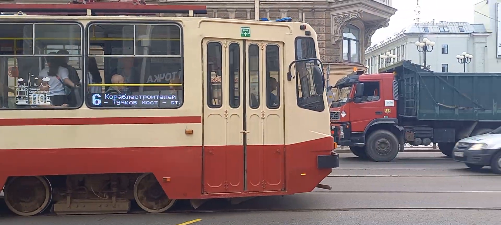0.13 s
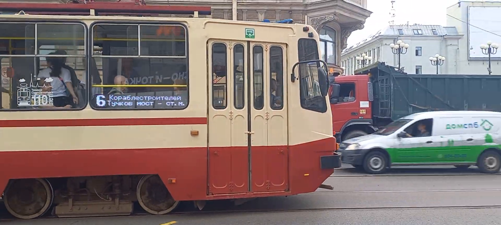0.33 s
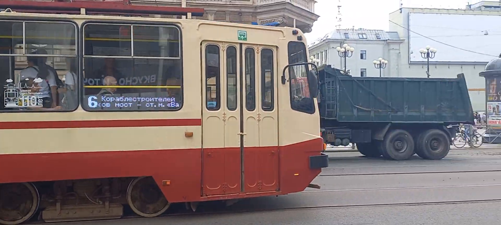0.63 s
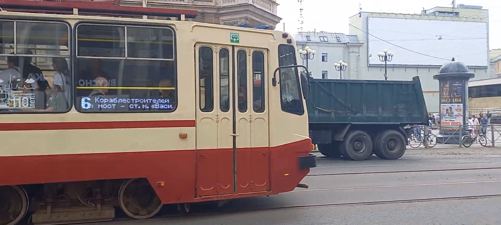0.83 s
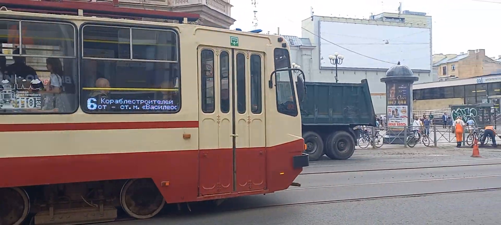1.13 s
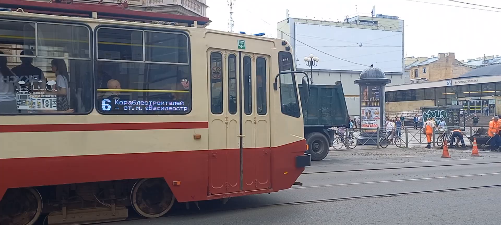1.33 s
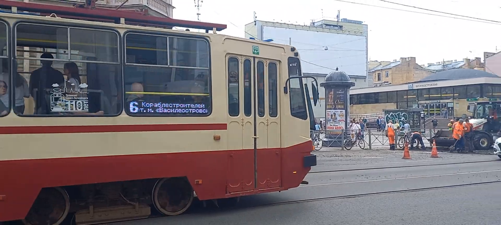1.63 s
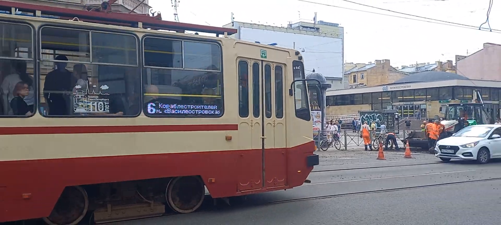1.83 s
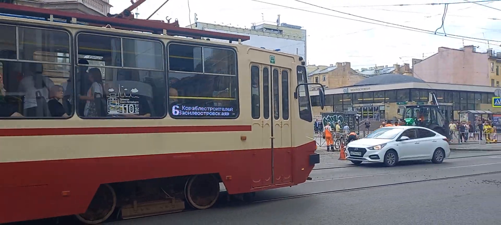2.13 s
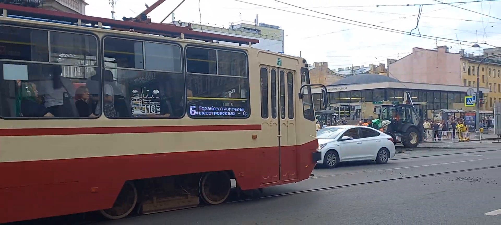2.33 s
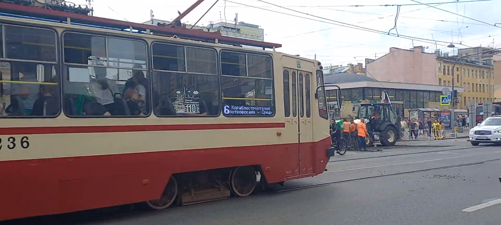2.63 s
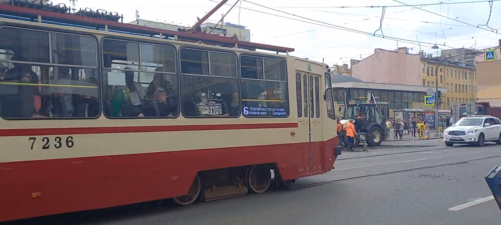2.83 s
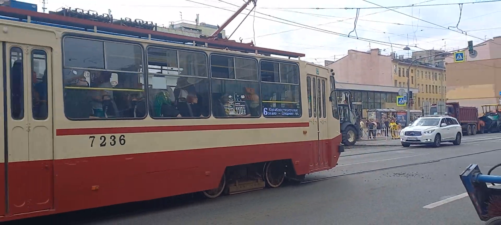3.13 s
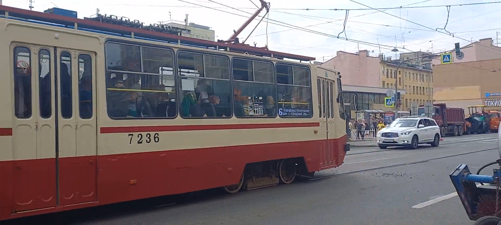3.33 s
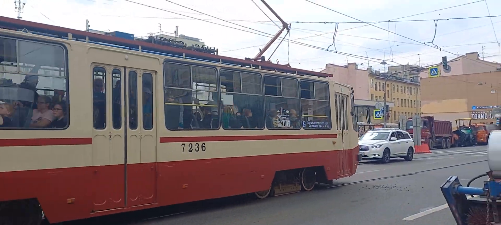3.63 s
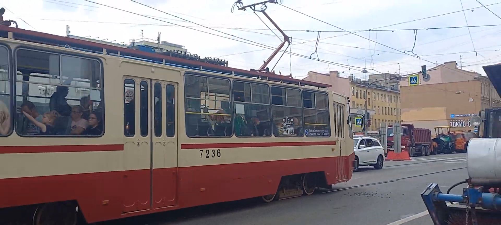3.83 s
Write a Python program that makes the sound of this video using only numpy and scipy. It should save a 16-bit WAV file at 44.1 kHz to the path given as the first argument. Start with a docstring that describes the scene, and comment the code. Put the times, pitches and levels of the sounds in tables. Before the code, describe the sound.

A tram rumbles slowly past up close, clanking, with brief flange squeaks near the end.

```python
"""A tram rolls slowly past at close range while a van passes early on, its tyres pattering over steady traffic.
The body rumbles and booms as filtered jolts and low tones, motors whirr, wheels hiss and crush grit.
Loose running gear soon clanks, as contacts ringing steel modes; then panels shudder and jolts thud.
A flange then catches the rail: wavering tones and scraped wheel modes squeak, hardest near the end.
Single wheel modes sing faintly in between, and draught buffets the microphones as lumpy low noise."""
import sys
import numpy as np
from scipy import signal
from scipy.fft import rfft, irfft
from scipy.io import wavfile
from scipy.ndimage import uniform_filter1d

SR = 44100
rng = np.random.default_rng(int(sys.argv[2]) if len(sys.argv) > 2 else 0)


def transcribe(signal):
    """Save signal, clipped to [-1, 1], as a 16-bit WAV file at the path in sys.argv[1]."""
    frames = np.atleast_2d(signal).T
    limited = np.clip(frames, -1, 1)
    pcm = np.round(limited * 32767).astype(np.int16)
    wavfile.write(sys.argv[1], SR, pcm)


N = 176400
T = np.arange(N) / SR
HZ = np.maximum(np.arange(N // 2 + 1) * SR / N, 1)
MIC_SPACING_S = 0.00049   # travel time between the two microphones
CUTOFF_HZ = 15750
EVEN_S = 0.043   # time over which small random jolts and contacts even out


def amp(db):
    """Decibels to gain."""
    return 10 ** (np.asarray(db) / 20)


def rms_one(x):
    """Scale to an rms of 1."""
    return x / np.sqrt(np.mean(x ** 2) + 1e-20)


def level(curve):
    """Gain over time from (s, dB) points."""
    return amp(np.interp(T, *np.transpose(curve)))


def drift(rate_hz):
    """Slow random wander of spread 1."""
    return rms_one(irfft(rfft(rng.standard_normal(N)) / (1 + (HZ / rate_hz) ** 2), N))


def colour(points):
    """Frequency response through (Hz, dB) points."""
    hz, db = np.transpose(points)
    return amp(np.interp(np.log(HZ), np.log(hz), db))


def resonances(modes):
    """Frequency response of parallel resonances, each carrying the power that its row gives."""
    response = 0
    for hz, width, db in modes:
        detuning = (HZ ** 2 - hz ** 2) / (HZ * width)
        response = response + amp(db) / np.sqrt(width) / (1 + 1j * detuning)
    return response


def echoes(count=6):
    """Frequency response of a few near reflections from road and underbody."""
    echo_db, latest_s = -12.5, 0.02
    delays = rng.uniform(0.1044, 1, count) * latest_s
    return 1 + amp(echo_db) * sum(np.exp(-2j * np.pi * HZ * s) for s in delays)


def grains(per_s, spread_db):
    """Random clicks, many small and a few large."""
    sizes = amp(spread_db * np.minimum(rng.exponential(1, N), 4))
    signs = rng.choice([-1, 1], N)
    return rms_one(sizes * signs * (rng.random(N) < per_s / SR))


def heard(response, direct, lead_ms, drive=None):
    """Stereo noise or drive through a response: a direct share that leads on the left, the rest diffuse noise."""
    source, mid, side = rfft(rng.standard_normal((3, N)))
    if drive is not None:
        source = rfft(drive)
    sign = np.array([[1], [-1]])
    share = np.clip(direct, 0, 1)
    # diffuse sound is alike at both microphones only at low frequencies
    alike = np.sinc(2 * HZ * MIC_SPACING_S)
    diffuse = np.sqrt((1 + alike) / 2) * mid + sign * np.sqrt((1 - alike) / 2) * side
    delay = np.exp(1j * np.pi * HZ * sign * lead_ms / 1000)
    mixed = np.sqrt(share) * source * delay + np.sqrt(1 - share) * diffuse
    return rms_one(irfft(response * mixed, N))


def swung(x, lead):
    """Shift the two channels against each other over time."""
    half = np.interp(T, *np.transpose(lead)) / 2
    return np.array([np.interp(T + half, T, x[0]), np.interp(T - half, T, x[1])])


def evened(x, window_s):
    """Hold the rms near 1 over a short window."""
    power = uniform_filter1d(np.mean(x ** 2, axis=0), max(int(window_s * SR), 1))
    return x / np.sqrt(power + .01)


def fluttering(x, count=24):
    """Let narrow bands of a sound flutter independently of each other."""
    patchy_db, patch_rate_hz = 2.5, 48
    spectrum, centres = rfft(x), np.linspace(0, CUTOFF_HZ, count)
    out = 0
    for hz in centres:
        band = irfft(spectrum * np.maximum(1 - abs(HZ - hz) / centres[1], 0), N)
        out = out + band * amp(patchy_db * drift(patch_rate_hz))
    return rms_one(out)


def burst(start, attack, decay, hold=0):
    """Envelope that rises, holds and dies away."""
    age = np.maximum(T - start, 0)
    return np.minimum(age / attack, 1) * np.exp(-np.maximum(age - max(attack, hold), 0) / decay)


def swell(start, length):
    """Envelope that rises and falls in one arch."""
    return np.sin(np.pi * np.clip((T - start) / length, 0, 1))


def note(hz, waver_hz):
    """A slightly unsteady sine of rms 1."""
    return np.sqrt(2) * np.sin(2 * np.pi * np.cumsum(hz + waver_hz * drift(57)) / SR)


def body(lumps_db=0.46, panel_db=-1.0):
    """Dense jolts from the track shake the floor and the side panels, which shudder in surges; jolts thud."""
    # Deep floor vibration. Each row: time in seconds, level in dB.
    floor_level = [(0, -29.5), (.55, -33), (1, -28.5), (1.5, -37), (2.3, -32), (2.9, -32.5), (3.5, -28),
                   (4, -29.5)]
    # Tone of the floor. Each row: frequency in Hz, relative density in dB per Hz.
    floor_tone = [(20, -41), (38, -51), (58, -10), (90, -6), (125, -4.5), (165, -4), (230, -55),
                  (500, -118)]
    # Steady panel rumble. Each row: time in seconds, level in dB before panel_db.
    panel_level = [(0, -25), (.3, -28.5), (.55, -27), (.82, -30), (.92, -24.5), (1.04, -24.5), (1.23, -29),
                   (1.5, -27.5), (2.06, -28.5), (2.12, -24), (2.7, -24.5), (3.3, -25), (3.78, -24),
                   (4, -22)]
    # Tone of the panels. Each row: frequency in Hz, relative density in dB per Hz.
    panel_tone = [(70, -46), (150, -4.5), (210, -1.5), (270, 2.5), (370, -2.5), (460, -8), (600, -36.5),
                  (1000, -19.5), (2500, -60)]
    # Surges of the side panels. Each row: start in seconds, length in seconds, level in dB before panel_db.
    shudders = [(1.36, 0.047, -23), (1.452, 0.06, -25), (1.578, 0.11, -22.5), (1.776, 0.06, -23.5),
                (1.989, 0.043, -20.5), (2.105, 0.082, -22.5), (2.191, 0.048, -21), (2.38, 0.069, -24),
                (2.487, 0.068, -25.5), (2.609, 0.03, -19.5), (3.54, 0.032, -23.5)]
    # Wheels drop over uneven rail. Each row: start in seconds, level in dB.
    thuds = [(1.349, -23.5), (1.468, -22), (1.595, -25), (1.626, -22), (1.772, -22.5), (2.394, -15),
             (2.565, -25), (2.618, -37), (2.799, -19), (3.062, -17.5), (3.467, -13.5), (3.928, -17)]
    # Tone of the thuds. Each row: frequency in Hz, relative density in dB per Hz.
    thud_tone = [(25, -58), (60, 0), (120, 9), (200, 3.5), (300, 0.5), (480, -18.5), (900, -17.5),
                 (2500, -81)]
    thud_attack_s, thud_decay_s = 0.019, 0.014

    deep = level(floor_level) * heard(colour(floor_tone), direct=0.28, lead_ms=1.0)

    surges = sum((amp(db) * swell(s, length)) ** 2 for s, length, db in shudders)
    shaking = np.sqrt(level(panel_level) ** 2 + surges) * amp(lumps_db * drift(18))
    rumble = heard(colour(panel_tone), direct=0.93, lead_ms=0.29, drive=grains(900, 3.1))
    panels = shaking * evened(rumble, EVEN_S)

    jolts = sum(amp(db) * burst(s, thud_attack_s, thud_decay_s) for s, db in thuds)
    thudding = jolts * evened(heard(colour(thud_tone), direct=0.61, lead_ms=0.24), EVEN_S)
    return deep + amp(panel_db) * panels + thudding


def booms(waver_hz=3):
    """A low body-panel resonance swells and dies as a nearly pure tone."""
    # Each row: start in seconds, length in seconds, pitch in Hz, level in dB.
    panel_booms = [(0.052, .115, 135.9, -19), (0.171, .17, 135.6, -20), (2.272, 0.26, 126, -21.5),
                   (2.781, 0.13, 146, -23.5), (3.488, 0.19, 160.3, -27)]
    out, waver = 0, waver_hz * drift(12.5)
    for s, length, hz, db in panel_booms:
        tone = np.sqrt(2) * np.sin(2 * np.pi * np.cumsum(hz + waver) / SR)
        out = out + amp(db) * swell(s, length) * tone
    return out


def crackle(count=18):
    """Grains of grit ring briefly, spread over a ladder of pitches."""
    grains_per_s, spread_db, width_hz = 260, 3.5, 270   # the rate is for each pitch
    spectrum = 0
    for hz in np.linspace(2100, 14500, count):
        spectrum = spectrum + rfft(grains(grains_per_s, spread_db)) * resonances([(hz, width_hz, 0)])
    return irfft(spectrum, N)


def wheels(flutter_db=1.6, chatter_db=2.1):
    """The rolling wheels hiss, ring in their modes and crush grit in uneven clumps."""
    # Steel rolling on steel. Each row: time in seconds, level of the hiss in dB before flutter.
    rolling_level = [(0, -42.5), (.8, -47), (1.4, -46), (1.65, -42), (1.95, -43.5), (2.3, -38.5),
                     (2.8, -35.5), (3.15, -35.5), (3.4, -37), (3.62, -34), (3.78, -38.5), (4, -33)]
    # Tone of the hiss. Each row: frequency in Hz, relative density in dB per Hz.
    hiss_tone = [(600, 5.5), (1350, -12.5), (1900, 7.5), (2350, 5), (2750, -8), (4000, -6.5), (4800, -6.5),
                 (6700, -4), (7900, -17.5), (9200, -19), (10500, -17.5), (13000, -17.5), (16000, -21)]
    # Modes of the rolling wheels. Each row: frequency in Hz, width in Hz, relative level in dB.
    wheel_modes = [(1740, 180, -10), (2190, 280, 11), (4063, 82, 6), (5710, 51, -2.5), (6150, 50, 0),
                   (6760, 75, 7.5), (8920, 55, -2.5), (9280, 120, -5.5), (10450, 130, -7),
                   (12100, 240, -11), (13600, 270, -11)]
    # Tone applied to the crackling grit. Each row: frequency in Hz, gain in dB.
    grit_tone = [(1500, 14), (2200, 5), (2900, 1), (4000, 3.5), (6600, -1.5), (8000, -0.5), (9200, -8),
                 (11000, -9.5), (13500, -11), (16000, -22)]
    ring_db, grit_db = -9.5, -8   # against the hiss
    swell_db = 8   # each mode swells and fades by itself

    hiss = fluttering(heard(colour(hiss_tone) * echoes(), direct=0.28, lead_ms=0.495))
    ring = 0
    for hz, width, db in wheel_modes:
        mode = heard(resonances([(hz, width, 0)]), direct=0.29, lead_ms=0.525)
        ring = ring + amp(db + swell_db * np.tanh(drift(5.9))) * mode
    crushed = heard(colour(grit_tone), direct=0.94, lead_ms=0.553, drive=rms_one(crackle()))
    grit = amp(grit_db + chatter_db * drift(60)) * crushed
    loudness = level(rolling_level) * amp(flutter_db * drift(10.6))
    return loudness * (hiss + amp(ring_db) * rms_one(ring) + grit)


def singing():
    """Friction on the rail lifts single wheel modes out of the hiss for a while."""
    # Each row: start in seconds, length in seconds, pitch in Hz, level in dB.
    sung_modes = [(2.18, 0.52, 6850, -51), (2.48, 0.43, 9000, -52), (2.6, .28, 9350, -51),
                  (2.7, 0.9, 5730, -48), (2.85, 0.63, 4010, -50.5), (3.07, 0.13, 2070, -40)]
    width_hz = 67
    out = 0
    for s, length, hz, db in sung_modes:
        mode = heard(resonances([(hz, width_hz, 0)]), direct=0.4, lead_ms=0.515, drive=grains(320, 2.8))
        out = out + amp(db) * swell(s, length) * mode
    return out


def squeaks(lead_ms=0.014, flutter_db=1.0, tone_lead_s=.000035):
    """Stick and slip drives the wheel: a clean tone that rings on when it locks, a rough ring when it scrapes."""
    # The flange rubs the rail. Each row: start in seconds, contact in seconds, pitch in Hz,
    # level in dB, roughness (0 is all tone, 1 or more all scrape).
    rubs = [(1.612, 0.064, 2320, -38.5, 0.83), (1.7, 0.022, 2290, -34.5, 1.1),
            (2.24, 0.057, 2290, -36.5, 0.6), (3.461, 0.02, 2290, -30.5, 1.1),
            (3.484, .01, 2290, -26.5, 0.95), (3.494, 0.0063, 2295, -21.5, 0.3),
            (3.508, 0.033, 2288, -26.5, 0.37), (3.55, 0.021, 2310, -32, 0.2), (3.9, 0.015, 2308, -17, 0.24),
            (3.912, 0.026, 2277, -13, .06), (3.948, 0.021, 2274, -21.5, 0.16), (3.985, .03, 2277, -25, 0.1)]
    # Higher modes shriek in the hardest rub. Each row: start in seconds, length in seconds,
    # pitch in Hz, level in dB before the left-right tilt.
    shriek_modes = [(3.902, 0.019, 6150, -36), (3.903, .012, 4850, -36), (3.915, 0.012, 4800, -26.5),
                    (3.927, 0.016, 6045, -33), (3.945, .028, 4070, -37), (3.91, 0.077, 10400, -46)]
    # Modes of the scraping wheel. Each row: frequency in Hz, relative level in dB.
    scrape_modes = [(1130, -6), (1215, -1.5), (1320, -2.5), (1470, -3), (1873, 2.5), (2040, 3.5), (2170, 6),
                    (2290, -2), (2440, -23), (4090, -14), (4785, -9), (6150, -10)]
    attack_s, release_s, shriek_attack_s = 0.0039, 0.0062, 0.011
    waver_hz, shriek_waver_hz, scrape_width_hz = 14.1, 29.9, 31
    free_ring_db, free_ring_s = -15, 0.042   # the wheel rings on after the flange lets go

    pitch = np.interp(T, [row[0] for row in rubs], [row[2] for row in rubs])
    tone = note(pitch, waver_hz) * amp(flutter_db * drift(70))
    tone = np.array([tone, np.interp(T - tone_lead_s, T, tone)])   # left leads
    scraped = resonances([(hz, scrape_width_hz, db) for hz, db in scrape_modes])
    scrape = evened(heard(scraped, direct=0.33, lead_ms=lead_ms), EVEN_S)

    clean_power = rough_power = 0
    for s, length, _, db, roughness in rubs:
        rub = amp(db) * burst(s, attack_s, release_s, length)
        ring = amp(db + free_ring_db) * burst(s, attack_s, free_ring_s, length)
        share = np.clip(roughness, 0, 1)
        clean_power = clean_power + (1 - share) * (rub ** 2 + ring ** 2)
        rough_power = rough_power + share * rub ** 2

    shrieks = 0
    for s, length, hz, db in shriek_modes:
        envelope = burst(s, shriek_attack_s, release_s, length)
        shrieks = shrieks + amp(db) * envelope * note(hz, shriek_waver_hz)
    tilt = amp([[-1], [1]])   # tones are stronger on the right
    return (np.sqrt(clean_power) * tone + shrieks) * tilt + np.sqrt(rough_power) * scrape


def clanks():
    """Each clank is a dying rattle of contacts that stirs steel modes unevenly; small fittings clink on one note."""
    # Loose running gear clanks. Each row: start in seconds, level of the rattle in dB, decay in seconds.
    knocks = [(.906, -41, 0.025), (0.963, -42.5, 0.011), (1.18, -41, 0.014), (1.203, -42, .008),
              (1.218, -41.5, 0.0087), (1.606, -30.5, 0.026), (1.645, -40.5, 0.055), (1.702, -54, .03),
              (2.024, -44, 0.0085), (2.42, -37.5, .013), (2.76, -32.5, 0.019), (2.85, -33, .014),
              (3.113, -31.5, 0.0086), (3.338, -33.5, .014), (3.472, -29.5, .037), (3.515, -33, .03),
              (3.576, -29.5, 0.029), (3.62, -38, 0.037), (3.67, -35.5, 0.016), (3.801, -33, 0.011),
              (3.9, -34, .03), (3.926, -28, 0.026)]
    # Tone of the rattle. Each row: frequency in Hz, relative density in dB per Hz.
    rattle_tone = [(500, -19), (1200, 6.5), (2200, 12.5), (2900, -2), (4000, 7), (6600, 7.5), (8200, -6),
                   (9400, -4), (11000, -6), (12800, -17), (16000, -24)]
    # Modes of the loose steel. Each row: frequency in Hz, width in Hz, relative level in dB.
    steel_modes = [(3725, 85, 6.5), (4500, 140, -3), (5830, 100, 7), (6780, 210, -16), (8100, 23, -11),
                   (9100, 110, 1), (11350, 89, 3), (12640, 410, 4), (14200, 160, -3)]
    # Small fittings. Each row: start in seconds, pitch in Hz, level in dB, decay in seconds.
    fittings = [(1.079, 2859, -39.5, .016), (1.608, 5636, -37, 0.019), (1.618, 6670, -46, .018),
                (1.619, 7650, -43, .016), (1.62, 9512, -48, 0.037), (1.703, 3680, -49, .018),
                (1.72, 2810, -39.5, 0.021), (3.487, 3720, -40.5, 0.029), (3.574, 6800, -34, .012),
                (3.582, 9249, -32.5, .01), (3.68, 14400, -49, .018)]
    knock_attack_s, clink_attack_s, clink_waver_hz = .01, 0.011, 18
    ring_db, grain_db, mode_spread_db = -6.5, 2, 6
    chatter_db = 4.5   # the contacts come in clumps

    force = np.sqrt(sum((amp(db) * burst(s, knock_attack_s, decay)) ** 2 for s, db, decay in knocks))
    clumps = grains(2200, grain_db) * amp(chatter_db * drift(150))
    contacts = evened(np.array([clumps]), EVEN_S)[0]
    rattle = heard(colour(rattle_tone) * echoes(), direct=0.64, lead_ms=0.13, drive=contacts)
    ring = 0
    for hz, width, db in steel_modes:
        mode = heard(resonances([(hz, width, 0)]), direct=0.076, lead_ms=0.11, drive=contacts)
        ring = ring + amp(db + mode_spread_db * np.tanh(drift(15))) * mode
    clinks = 0
    for s, hz, db, decay in fittings:
        clinks = clinks + amp(db) * burst(s, clink_attack_s, decay) * note(hz, clink_waver_hz)
    return force * (rattle + amp(ring_db) * rms_one(ring)) + clinks


def gears(flutter_db=2.0):
    """Motors and gears whirr as coloured noise, with a few faint narrow resonances as notes."""
    # The whirr. Each row: time in seconds, level in dB before flutter.
    whirr_level = [(0, -42), (.9, -44.5), (1.4, -39.5), (1.85, -41), (2.2, -38), (2.85, -38), (3.3, -34.5),
                   (3.6, -36), (4, -36.5)]
    # Tone of the whirr. Each row: frequency in Hz, relative density in dB per Hz.
    whirr_tone = [(250, -12), (420, -10), (530, 6.5), (750, 1.5), (950, -2), (1350, -32), (1900, -32),
                  (3000, -60)]
    # Stereo place of the whirr. Each row: time in seconds, lead of the left microphone in seconds.
    left_lead = [(0, 0.0002), (2, 0.00031), (3, 0.0002), (4, 0.00038)]
    # Notes in the whirr. Each row: frequency in Hz, width in Hz, relative level in dB.
    whirr_notes = [(263, 5.3, 0), (496.6, 11.5, 6.5), (593.5, 21, 3), (640.4, 21, 0.5), (750.4, 17, -1.5)]
    # The notes grow as the rear bogie nears. Each row: time in seconds, level in dB before flutter.
    notes_level = [(0, -48), (1.3, -47), (2.2, -38), (2.9, -42), (3.35, -32.5), (4, -33.5)]
    whirr = swung(heard(colour(whirr_tone) * echoes(), direct=0.83, lead_ms=0), left_lead)
    notes = heard(resonances(whirr_notes), direct=0.56, lead_ms=0.11)
    return amp(flutter_db * drift(19)) * (level(whirr_level) * whirr + level(notes_level) * notes)


def draught(gust_db=5.0):
    """The draught of the passing tram buffets the microphones: lumpy noise, different at each."""
    # Each row: time in seconds, level in dB.
    draught_level = [(0, -37), (.45, -34), (.7, -42), (1.05, -32.5), (1.35, -25.5), (1.8, -24.5),
                     (2.15, -25), (2.65, -26), (2.95, -32), (3.3, -32.5), (3.6, -47), (4, -28)]
    # Tone of the draught. Each row: frequency in Hz, relative density in dB per Hz.
    draught_tone = [(20, -26), (38, -24), (60, -2.5), (110, 1), (190, -4), (330, 0.5), (520, -16),
                    (800, -17.5), (2000, -53)]
    eddies = irfft(rfft(rng.standard_normal((2, N))) * colour(draught_tone), N)
    gusts = amp(gust_db * np.array([drift(39), drift(52)]))
    return level(draught_level) * rms_one(eddies * gusts)


def traffic(road_roughness_db=1.5, tread_db=1.7):
    """Steady far traffic, and a van's tyres that patter on the asphalt, swelling and fading with its distance."""
    # Tone of the far traffic. Each row: frequency in Hz, relative density in dB per Hz.
    street_tone = [(25, -32), (80, 2), (300, -3), (650, -14), (1000, -7), (1450, -9.5), (2200, -15.5),
                   (3000, -21.5), (6500, -32), (8200, -80), (12500, -33), (16000, -59)]
    # Tone of the van's tyres. Each row: frequency in Hz, relative density in dB per Hz.
    tyre_tone = [(200, -14), (420, 7), (650, -16), (950, 4), (1150, 1), (1400, -15), (1700, -19),
                 (2100, -4), (2600, -17.5), (3300, -14.5), (4500, -24.5), (7000, -24.5), (9000, -31),
                 (12500, -26.5), (16000, -39)]
    street_db, van_db = -34.5, -29   # the van's level is at its nearest, before flutter
    nearest_s, width_s = 0.29, 0.26   # nearest moment; time to cover its own distance
    nearness = 1 / (1 + ((T - nearest_s) / width_s) ** 2)
    far = amp(street_db) * heard(colour(street_tone), direct=0.44, lead_ms=-0.38)
    patter = heard(colour(tyre_tone) * echoes(), direct=0.18, lead_ms=-0.2, drive=grains(700, 2.5))
    flutter = road_roughness_db * drift(22) + tread_db * drift(100)
    return far + amp(van_db + flutter) * nearness * evened(patter, EVEN_S)


def scene():
    """The tram in front of the road traffic."""
    tram = body() + booms() + wheels() + singing() + squeaks() + clanks() + gears()
    return tram + draught() + traffic()


def record(dry):
    """A steep elliptic low-pass cuts the top."""
    return signal.sosfilt(signal.ellip(12, .1, 90, CUTOFF_HZ, fs=SR, output="sos"), dry)


dry = scene()
out = record(dry)
transcribe(out)
```